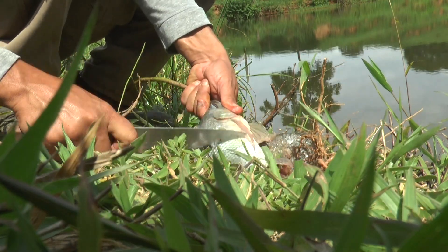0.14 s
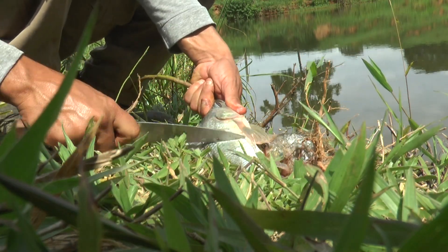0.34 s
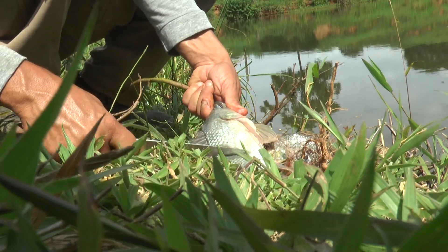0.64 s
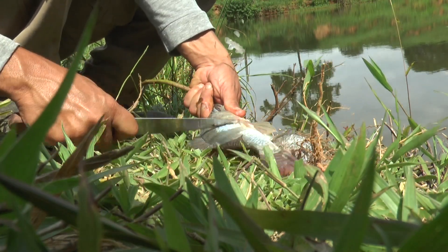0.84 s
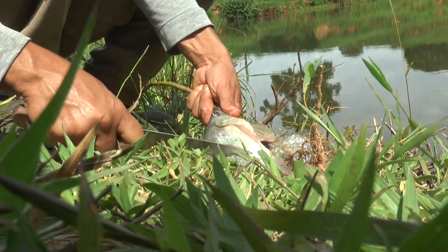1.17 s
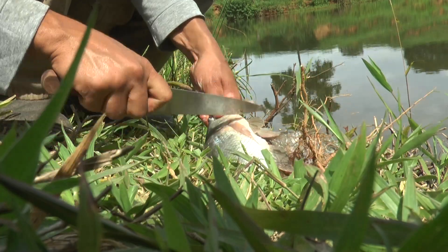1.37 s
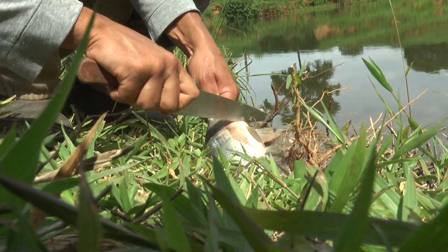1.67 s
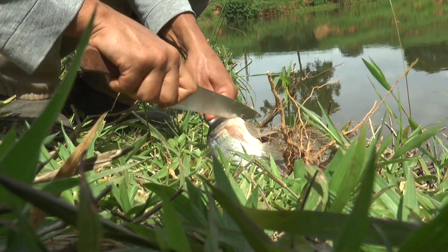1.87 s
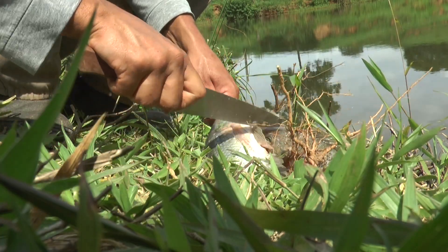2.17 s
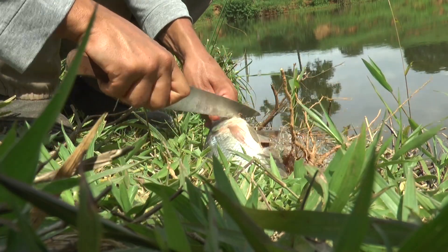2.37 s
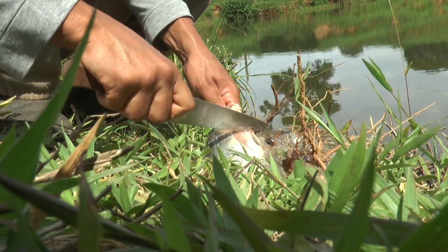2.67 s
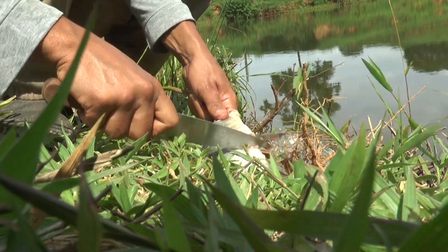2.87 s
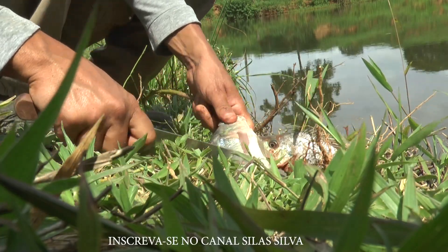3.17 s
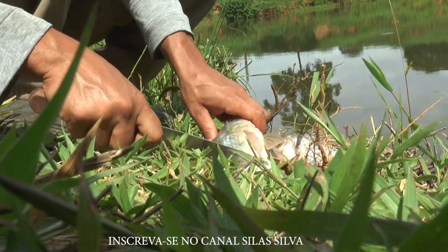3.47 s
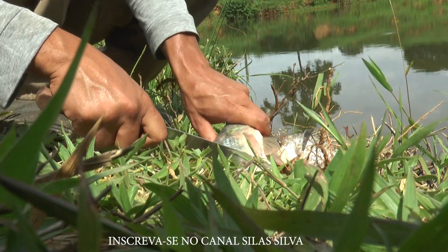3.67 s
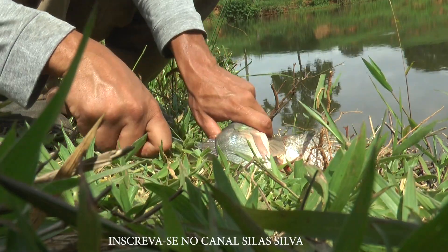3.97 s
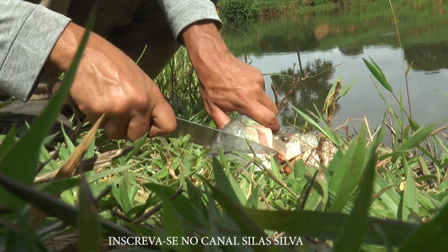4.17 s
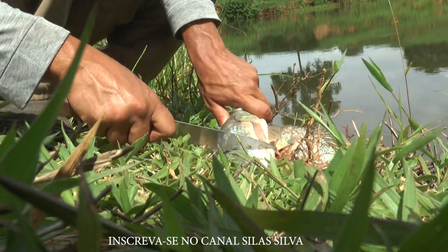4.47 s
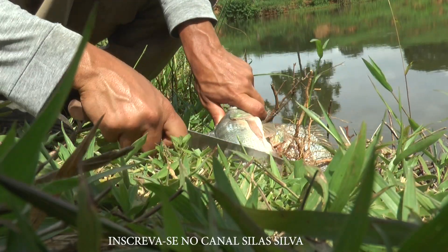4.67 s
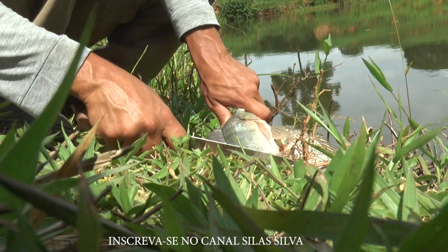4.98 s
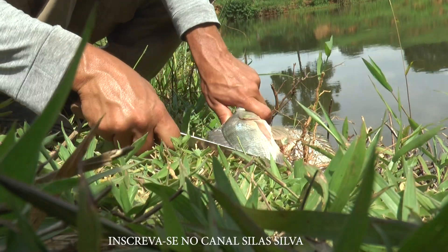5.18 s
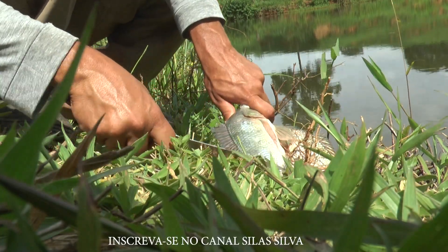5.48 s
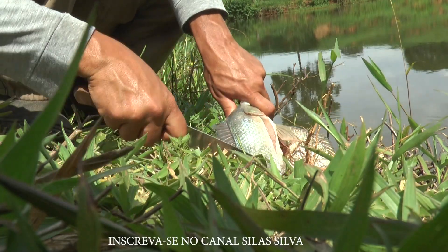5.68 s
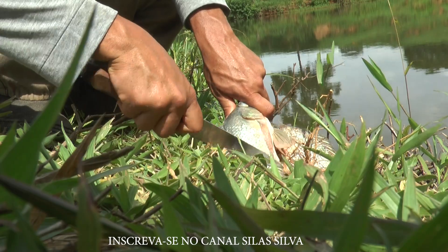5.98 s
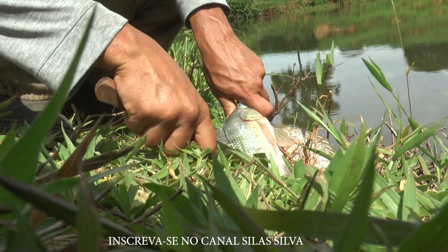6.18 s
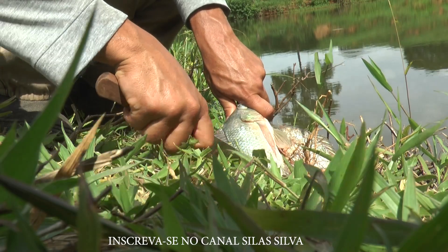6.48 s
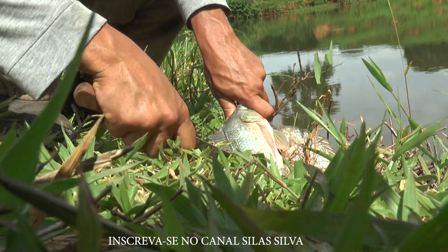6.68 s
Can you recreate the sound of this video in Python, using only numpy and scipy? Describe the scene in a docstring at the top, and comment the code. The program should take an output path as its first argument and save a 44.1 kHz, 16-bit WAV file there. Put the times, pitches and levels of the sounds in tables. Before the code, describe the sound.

Close by, a knife rasps over fish scales in quick, irregular strokes, then crunches through skin and bone, then draws softer, crackling slices along the wet flank. Sharp little ticks, dull knocks on the ground and a light crackle of grass go with the work. Far off, one bird trills on and on while others chirp and whistle faintly, over a low hum and quiet open air.

```python
"""A knife scales and cuts a fish, close by, on the grassy bank of a pond.
The blade rasps over the scales, crunches in behind the head, then slices along the flank; each stroke
is a burst of tiny fractures. Scales and bones tick, fish and hands knock on the ground, grass crackles.
Far off a bird trills while others chirp and whistle, over a low hum and quiet outdoor air."""
import sys
import numpy as np
from scipy import signal
from scipy.fft import rfft, irfft, next_fast_len
from scipy.io import wavfile
from scipy.ndimage import uniform_filter1d, map_coordinates

SR = 44100
rng = np.random.default_rng(int(sys.argv[2]) if len(sys.argv) > 2 else 0)


def persist_wave(psi):
    """Save psi, clipped to +-1, as 16-bit WAV."""
    counts = np.round(np.clip(psi, -1, 1) * 32767).astype(np.int16)
    wavfile.write(sys.argv[1], SR, np.atleast_2d(counts).T)


N = 301203
TIME_S = np.arange(N) / SR
FFT_SIZE = 2 * next_fast_len(N // 2 + 8192)
FREQ_HZ = np.fft.rfftfreq(FFT_SIZE, 1 / SR)

# knife strokes: middle_s, length_s, level_db, bite_db (crunch and thud over hiss)
RASP_STROKES = [(.028, 0.023, -43.5, -3.5), (.089, 0.015, -43, -0.5), (.112, 0.0093, -33, -8.5),
                (.2205, .012, -31.5, -12.5), (.262, 0.0072, -36, -8), (.247, 0.02, -47, -0.5),
                (.286, .018, -49, -1.5), (.320, 0.018, -41, -5.5), (.347, 0.036, -44.5, -8.5),
                (.746, 0.024, -46, -10), (.837, 0.06, -37, -12.5), (.888, 0.056, -34.5, -15),
                (.922, .012, -37, -11), (1.164, 0.022, -40.5, -19), (1.252, 0.015, -47, -6),
                (1.275, 0.029, -31.5, -15.5), (1.294, 0.023, -41.5, -0.5), (1.459, .028, -42.5, -4),
                (1.530, 0.018, -32.5, -14), (1.560, 0.026, -33.5, -9), (1.591, .018, -37.5, -5),
                (1.715, 0.028, -41.5, -10.5)]  # raked over the scales
CUT_STROKES = [(1.954, 0.0039, -39.5, -15), (2.064, 0.033, -47, -5.5), (2.098, 0.0059, -45, 0.5),
               (2.214, .022, -48, -4), (2.356, 0.0087, -45.5, 3), (2.450, .012, -57.5, 8.5),
               (2.479, .016, -54, 0), (2.533, 0.018, -52, 2.5), (2.566, 0.032, -46.5, 0.5),
               (2.824, 0.0093, -43.5, 0), (2.840, 0.01, -47, -3), (2.864, .015, -38.5, -.5),
               (2.956, .014, -61.5, 8.5), (3.076, 0.016, -42.5, -4), (3.0925, .012, -35.5, 0),
               (3.147, 0.014, -50.5, 0.5), (3.189, 0.0062, -57, 8.5), (3.231, .012, -57, 3),
               (3.315, .014, -40.5, 0), (3.420, 0.0087, -47, 2)]  # pushed through skin and bone
SLICE_STROKES = [(3.533, 0.037, -38, -10.5), (3.777, .032, -46.5, -10), (3.885, 0.053, -58, -1),
                 (3.947, 0.031, -44.5, -7), (4.378, 0.014, -52.5, -5), (4.659, 0.069, -44.5, -11),
                 (4.805, 0.16, -53.5, -9), (4.920, 0.026, -48, -11.5), (4.977, 0.077, -45, -11),
                 (5.077, 0.025, -46.5, -13), (5.145, 0.045, -49, -10), (5.224, 0.039, -45, -7),
                 (5.268, 0.059, -50, -2.5), (5.322, 0.024, -46, -7), (5.425, 0.096, -53, -3),
                 (5.517, 0.0046, -60.5, 12.5), (5.862, 0.062, -48.5, -4), (5.898, 0.011, -41.5, -6),
                 (5.925, 0.05, -39.5, -13.5), (6.022, .056, -54, -4), (6.140, .024, -46, -13),
                 (6.180, 0.038, -45, -7), (6.355, 0.085, -60, -8), (6.548, 0.079, -45, -11),
                 (6.685, .034, -52.5, -11), (6.810, 0.069, -46.5, -4.5)]  # drawn along the wet flank
# stroke spectra: freq_hz, gain_db
RASP_SPECTRUM = [(60, -33), (150, -1.5), (450, -3.5), (900, -17.5), (1500, -9), (2400, -16), (3300, -5.5),
                 (5000, 1.5), (6500, 4.5), (7800, -9), (10500, -17), (12500, -17.5), (15800, -21)]
CUT_SPECTRUM = [(60, -15), (160, 2.5), (450, -4.5), (750, -9), (1400, 2), (2600, -9), (4300, -0.5),
                (5500, -10.5), (6700, -10.5), (9000, -17.5), (12000, -25.5), (15800, -45)]
SLICE_SPECTRUM = [(60, -37), (160, 2), (350, 0), (650, -6), (1200, 0.5), (2000, -3.5), (3200, -3),
                  (4800, -2), (6800, -6), (8000, -10.5), (11000, -15), (15800, -25)]
# resonances of blade and fish: centre_hz, width_hz, lift_db
BLADE_RESONANCES = [(3304, 270, 9), (4430, 190, 6.5), (5440, 370, 5), (5710, 300, -11), (6600, 900, 2),
                    (8390, 920, 8), (8850, 230, -8.5), (9590, 800, 9), (11000, 490, 7.5)]
CARCASS_RESONANCES = [(1540, 126, 6.5), (1750, 170, -4), (2070, 190, 9.5), (3800, 330, 2), (4890, 260, 8.5)]
FLANK_RESONANCES = [(1310, 440, 1.2), (3220, 280, 5), (5000, 400, 4.4), (6640, 540, 3)]
# snaps of scales and small bones: start_s, peak_db, pitch_hz
SCALE_TICKS = [(0.4388, -39, 4770), (1.3334, -37, 4450), (1.585, -24.5, 5200), (1.954, -38.5, 4150),
               (2.096, -29.5, 6150), (2.1, -30.5, 2200), (2.864, -27.5, 3670), (3.0707, -31, 5540),
               (3.0932, -28, 1600), (4.272, -35, 5200), (4.811, -43, 3800), (5.102, -42, 3300),
               (5.2537, -26, 3280), (5.348, -34, 3950), (6.5189, -24, 7060), (6.784, -30.5, 5600)]
# fish and hands on the ground, and two deep thuds of the blade in the flesh (1.294 s, 1.593 s): start_s,
# level_db, pitch_hz
KNOCKS = [(0.259, -46, 138), (.721, -50, 119), (.915, -52, 145), (1.294, -40.5, 452),
          (1.593, -40, 380), (1.71, -43.5, 292), (3.53, -48.5, 288), (3.775, -45, 365),
          (5.32, -47.5, 150), (5.893, -33, 840)]
# course of the trill: time_s, top_pitch_hz, level_db, fifth_level_db
TRILL_COURSE = [(.2, 3910, -64, -65), (1.6, 3930, -66.5, -73), (2.2, 4000, -64, -64),
                (3.1, 4206, -60, -65.5), (4.3, 4170, -63, -71), (5.2, 4440, -67, -74),
                (5.55, 4620, -63, -83), (6.1, 4610, -60.5, -84), (6.45, 4800, -57, -68),
                (6.75, 4880, -72, -82)]
# second bird's chirps: peak_s, top_pitch_hz, level_db
CHIRP_NOTES = [(.377, 6250, -64), (.485, 7100, -67.5), (.57, 6970, -60), (.748, 6650, -55),
               (1.386, 5500, -64.5), (1.622, 5400, -64), (1.833, 5650, -63.5)]
# bird whistles, one list per call: time_s, pitch_hz, level_db
WHISTLE_CALLS = [
    [(.94, 2660, -67), (.974, 3070, -67), (1.012, 3185, -58), (1.082, 3220, -54.5), (1.15, 3185, -63),
     (1.23, 3100, -62), (1.27, 3020, -79)],
    [(4.29, 2280, -79), (4.32, 2360, -74), (4.38, 2590, -76), (4.45, 2790, -69), (4.515, 2880, -73),
     (4.6, 2780, -71), (4.63, 2640, -70)],
]
# hum tones: pitch_hz, rms_db
HUM_TONES = [(59.3, -70.5), (91, -77.5), (119.5, -73.5), (181, -74), (241.3, -66)]
# drone beside the hum: time_s, rms_db
DRONE_LEVELS = [(0, -106), (3.2, -72), (3.7, -65), (4.1, -76), (4.45, -63.5), (4.9, -79), (6.8, -71.5)]
# outdoor air: freq_hz, gain_db
AIR_SPECTRUM = [(12, -66), (20, -18), (42, -9.5), (75, -0.5), (120, -0.5), (187, -5), (240, 1), (326, -9),
                (408, -6.5), (637, -12.5), (1280, -12.5), (2500, -20), (3800, -16), (4500, -15),
                (8550, -27), (14500, -34.5), (15800, -28.5)]


def knife():
    """Dense bright rasps, coarse hollow cuts, soft crackling slices."""
    rasps = strokes(RASP_STROKES, fractures(per_s=12000, scatter_db=4, catch_db=3.5, catch_hz=250),
                    spectrum(RASP_SPECTRUM, BLADE_RESONANCES), hiss_db=-3, crunch_db=-0.5, thud_db=-7.5,
                    rise_share=0.44, dig_share=0.1, steepness=2.3)
    cuts = strokes(CUT_STROKES, fractures(per_s=5000, scatter_db=3, catch_db=5, catch_hz=350),
                   spectrum(CUT_SPECTRUM, CARCASS_RESONANCES), hiss_db=-2.5, crunch_db=0.5, thud_db=-6.5,
                   rise_share=0.42, dig_share=0.06, steepness=2.24)
    slices = strokes(SLICE_STROKES, fractures(per_s=4000, scatter_db=4.5, catch_db=3, catch_hz=240),
                     spectrum(SLICE_SPECTRUM, FLANK_RESONANCES), hiss_db=-2.5, crunch_db=-2, thud_db=-4,
                     rise_share=0.53, dig_share=0.08, steepness=1.9)
    # colour shifts as the contact point travels along the blade
    return shift_colour(rasps + cuts + slices, depth_db=3, span_bins=3, span_frames=5)


def strokes(table, grains, gain, hiss_db, crunch_db, thud_db, rise_share, dig_share, steepness):
    """Each stroke catches, holds, lets go: hiss at the edge, crunch in skin, a later thud in flesh."""
    drive = np.zeros((3, N))
    for middle_s, length_s, level_db, bite_db in table:
        near = slice(max(0, int((middle_s - 2 * length_s) * SR)), int((middle_s + 2 * length_s) * SR))
        peak_s = middle_s + (rise_share - 0.5) * length_s
        layers = [(level_db, 0), (level_db + bite_db, 0), (level_db + bite_db, dig_share)]
        for layer, (db, lag_share) in enumerate(layers):
            offset = (TIME_S[near] - peak_s) / length_s - lag_share
            force = np.exp(-np.abs(offset / np.where(offset < 0, rise_share, 1 - rise_share)) ** steepness)
            force_rms = np.sqrt(np.mean(force ** 2))
            drive[layer, near] += amp(db) * force_rms * unit_rms(force * grains[layer][near])
    above_thud, above_crunch = (1 - 1 / (1 + (FREQ_HZ / edge_hz) ** 8) for edge_hz in (750, 2600))
    bands = np.sqrt([above_crunch, above_thud * (1 - above_crunch), 1 - above_thud])
    return sum(amp(db) * ring(push, gain * band)
               for db, push, band in zip((hiss_db, crunch_db, thud_db), drive, bands))


def fractures(per_s, scatter_db, catch_db, catch_hz, trains=3):
    """Trains of tiny snaps of random size, bunched alike as the contact catches and slips."""
    hits = (rng.random((trains, N)) < per_s / SR) * rng.choice([-1, 1], (trains, N))
    size_db = scatter_db * rng.standard_normal((trains, N)) + catch_db * wobble(catch_hz)
    return unit_rms(hits * amp(size_db))


def ticks(t60_s=0.0079, log_width=0.34):
    """A scale or bone gives way with one short crack."""
    out, t = np.zeros(N + SR), np.arange(SR // 20) / SR
    hz = np.fft.rfftfreq(len(t), 1 / SR)
    for start_s, peak_db, pitch_hz in SCALE_TICKS:
        band = 1 / (1 + (np.log((hz + 1) / pitch_hz) / log_width) ** 2)
        noise = irfft(rfft(rng.standard_normal(len(t))) * band, len(t))
        crack = noise * amp(-60 * t / t60_s)
        out[round(start_s * SR):][:len(t)] += amp(peak_db) * crack / np.abs(crack).max()
    return out[:N]


def knocks(attack_s=0.00066, t60_cycles=21.4):
    """Dull, damped pushes on soft ground or deep in the flesh; low ones last longer."""
    out, t = np.zeros(N + SR), np.arange(SR // 5) / SR
    for start_s, level_db, pitch_hz in KNOCKS:
        envelope = amp(level_db - 60 * t * pitch_hz / t60_cycles) * (1 - np.exp(-t / attack_s))
        out[round(start_s * SR):][:len(t)] += envelope * np.sin(2 * np.pi * pitch_hz * t)
    return out[:N]


def handling(rasp_db=-61, cut_db=-65, slice_db=-63, spread_s=0.069):
    """Grass and wet skin crackle under the hands, most around each stroke."""
    effort = np.zeros(N)
    for table, db in ((RASP_STROKES, rasp_db), (CUT_STROKES, cut_db), (SLICE_STROKES, slice_db)):
        nearest_s = np.min([np.abs(TIME_S - row[0]) for row in table], axis=0)
        effort = np.maximum(effort, amp(db) / (1 + (nearest_s / spread_s) ** 2))
    crackle = fractures(per_s=1300, scatter_db=6, catch_db=4.5, catch_hz=90, trains=1)[0]
    rustle = ring(effort * crackle, spectrum(SLICE_SPECTRUM))
    return shift_colour(rustle, depth_db=5, span_bins=14, span_frames=3)


def trill(notes=53, start_s=0.183, gap_s=0.11297, slowing_s=0.000395, lag_s=0.005):
    """A run of notes climbs and slows as the bird tires; its second voice lags, a fifth higher."""
    k = np.arange(notes)
    times_s = start_s + gap_s * k + slowing_s * k * (k - 1) / 2
    course_s, *columns = np.transpose(TRILL_COURSE)
    top_hz, level_db, fifth_db = (np.interp(times_s, course_s, column) for column in columns)
    first_voice = chirps(zip(times_s, top_hz, level_db))
    return first_voice + chirps(zip(times_s + lag_s, 1.5 * top_hz, fifth_db))


def chirps(notes, rise_s=0.012, fall_s=0.021, droop=0.27, flutter_db=4.5):
    """Short bird notes; each arches over in pitch and drops steeply."""
    out, t = np.zeros(N + SR), np.arange(-SR // 40, SR // 26) / SR
    swell = np.sqrt(2) * np.exp(-(t / np.where(t < 0, rise_s, fall_s)) ** 2)
    arch = np.abs(t / np.where(t < 0, 0.019, 0.026)) ** 1.8
    quaver = 1 + 0.02 * wobble(700)
    for peak_s, top_hz, level_db in notes:
        bend = droop * amp(3 * rng.standard_normal())
        start = round((peak_s + t[0]) * SR)
        span = slice(start, start + len(t))
        out[span] += amp(level_db) * swell * sine(top_hz * np.exp(-bend * arch) * quaver[span])
    return out[:N] * amp(flutter_db * wobble(250))


def whistles(waver=0.0035):
    """Long thin bird calls that rise and sink."""
    out = np.zeros(N)
    for call in WHISTLE_CALLS:
        times_s, hz, db = np.transpose(call)
        pitch_hz = np.interp(TIME_S, times_s, hz) * (1 + waver * wobble(150))
        gate = (TIME_S > times_s[0]) & (TIME_S < times_s[-1])
        out += np.sqrt(2) * amp(np.interp(TIME_S, times_s, db)) * gate * sine(pitch_hz)
    return out


def hum(drone_hz=269, drift_hz=0.3, sway_db=0.8):
    """Low, nearly steady tones, as of a distant pump; a drone comes and goes beside them."""
    def tone(hz):
        return np.sqrt(2) * sine(hz + drift_hz * wobble(2)) * amp(sway_db * wobble(3))
    drone = amp(np.interp(TIME_S, *np.transpose(DRONE_LEVELS))) * tone(drone_hz)
    return drone + sum(amp(db) * tone(hz) for hz, db in HUM_TONES)


def air(level_db=-61, swell_db=0.42):
    """Quiet, uneven rush of open air."""
    rush = ring(rng.standard_normal(N), spectrum(AIR_SPECTRUM))
    rush = shift_colour(rush, depth_db=3.5, span_bins=6, span_frames=12)
    return amp(level_db - swell_db * wobble(3.005)) * rush


def bank_scatter(x, t60_s, wet_db):
    """The bank and its plants scatter a faint tail."""
    t = np.arange(SR // 2) / SR
    tail = rng.standard_normal(len(t)) * amp(-60 * t / t60_s)
    return x + amp(wet_db) * signal.fftconvolve(x, tail / np.linalg.norm(tail))[:N]


def shift_colour(x, depth_db, span_bins, span_frames):
    """Random peaks and dips come and go, shallower below 600 Hz."""
    hz, _, frames = signal.stft(x, SR, nperseg=512)
    field = uniform_filter1d(rng.standard_normal(frames.shape), span_bins, axis=0)
    field = uniform_filter1d(field, span_frames, axis=1)
    gain_db = depth_db * np.minimum(hz / 600, 1)[:, None] * unit_rms(field)
    return signal.istft(frames * unit_rms(amp(gain_db)), nperseg=512)[1][:N]


def spectrum(points, resonances=()):
    """Gain per frequency: a smooth curve plus peaks and notches."""
    hz, db = np.transpose(points)
    curve_db = np.interp(np.log(FREQ_HZ + 1), np.log(hz), db)
    peaks_db = sum(lift_db / (1 + (2 * (FREQ_HZ - centre_hz) / width_hz) ** 2)
                   for centre_hz, width_hz, lift_db in resonances)
    return amp(curve_db + peaks_db)


def ring(x, gain):
    """Minimum-phase filter, scaled to keep the power of white noise."""
    cepstrum = irfft(np.log(np.maximum(unit_rms(gain), 1e-4)))
    cepstrum[1:FFT_SIZE // 2] *= 2
    cepstrum[FFT_SIZE // 2 + 1:] = 0
    return irfft(rfft(x, FFT_SIZE) * np.exp(rfft(cepstrum)))[..., :N]


def wobble(rate_hz):
    """Smooth random curve, rate_hz knots a second."""
    return map_coordinates(rng.standard_normal(int(N * rate_hz / SR) + 4), [TIME_S * rate_hz])


def sine(pitch_hz):
    return np.sin(2 * np.pi * np.cumsum(pitch_hz) / SR)


def amp(db):
    return 10 ** (np.asarray(db) / 20)


def unit_rms(x):
    return x / np.sqrt(np.mean(x ** 2) + 1e-20)


def scene(pan_db=2.7):
    """Near knife work, far birds, hum and air, all louder on the left."""
    near = bank_scatter(knife() + ticks() + knocks() + handling(), t60_s=0.085, wet_db=-27)
    far = bank_scatter(trill() + chirps(CHIRP_NOTES) + whistles(), t60_s=0.3, wet_db=-7)
    return (near + far + hum() + air()) * amp([[pan_db], [-pan_db]])


def record(dry, hiss_db=-74, cutoff_hz=15900):
    """Faint hiss per channel, then a hard band limit."""
    noisy = dry + amp(hiss_db) * rng.standard_normal(dry.shape)
    return irfft(rfft(noisy, FFT_SIZE) * (FREQ_HZ < cutoff_hz))[:, :N]


dry = scene()
out = record(dry)
persist_wave(out)
```